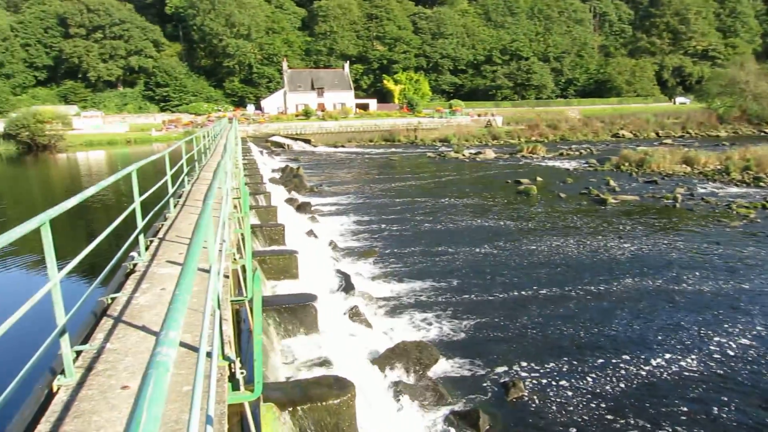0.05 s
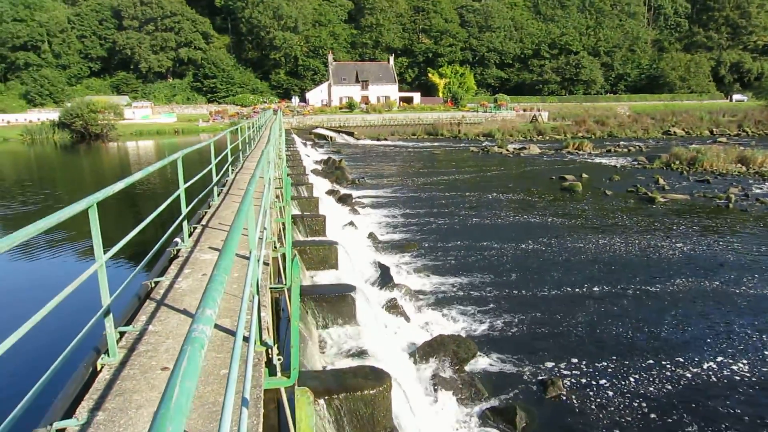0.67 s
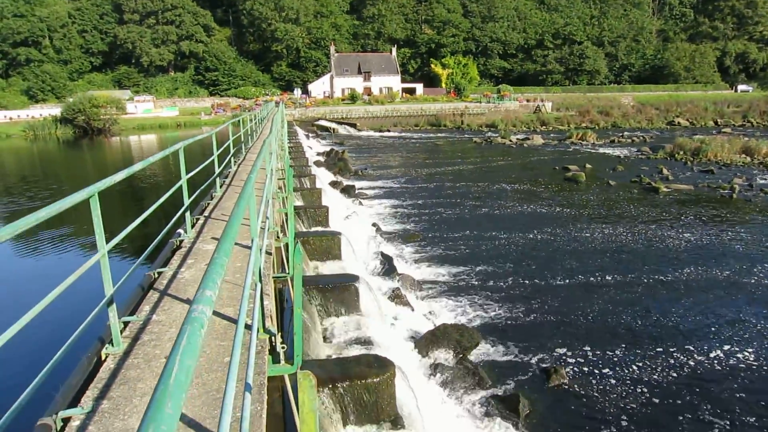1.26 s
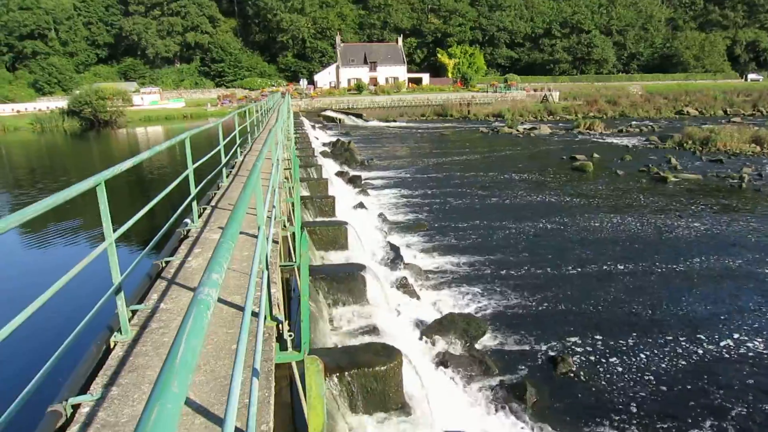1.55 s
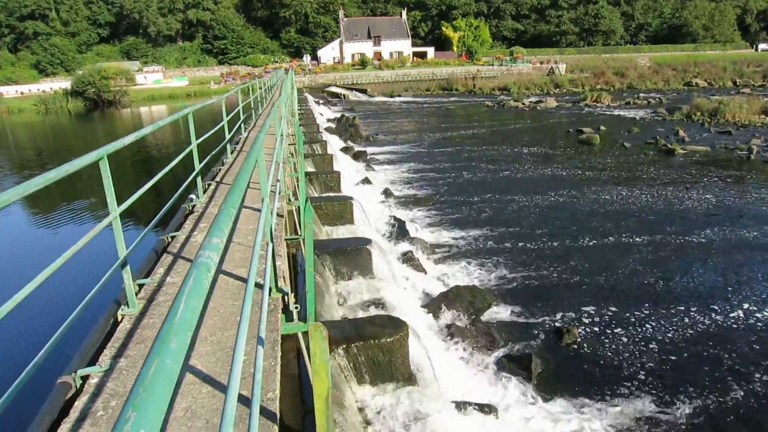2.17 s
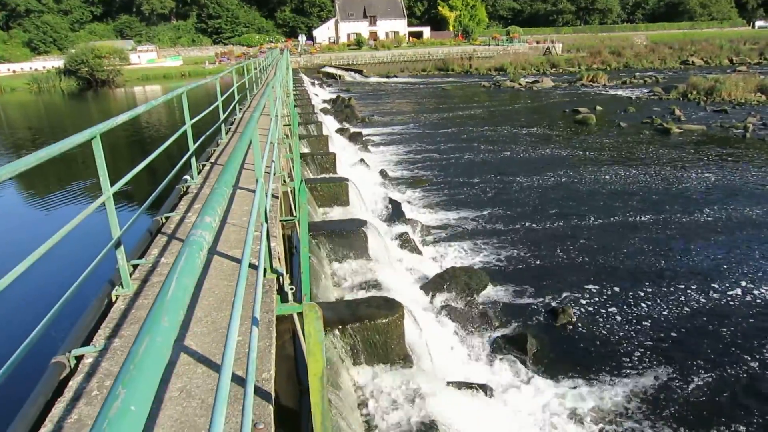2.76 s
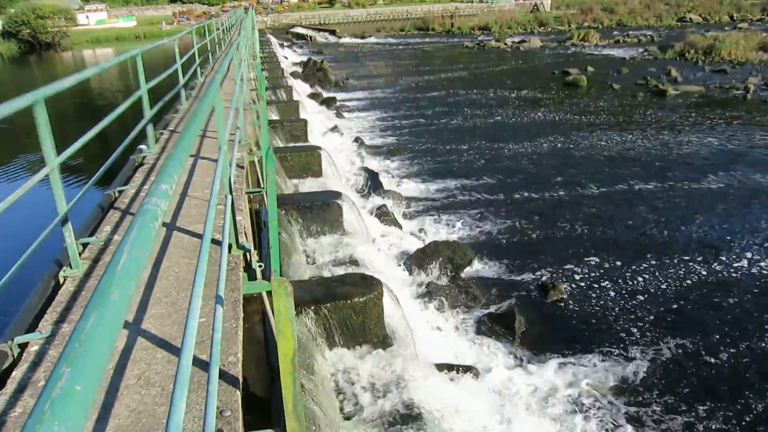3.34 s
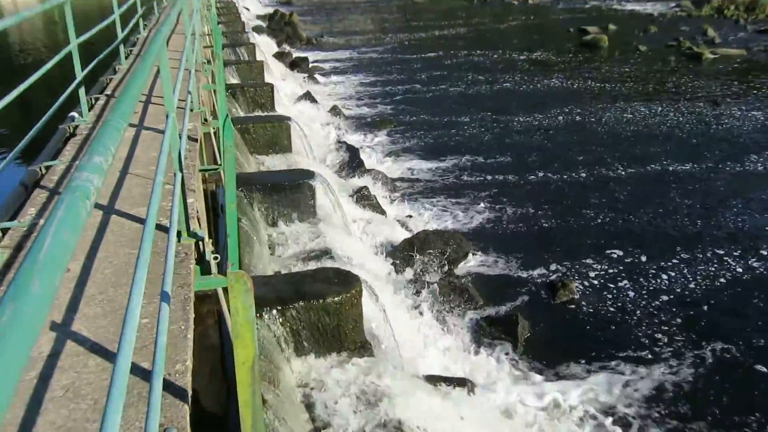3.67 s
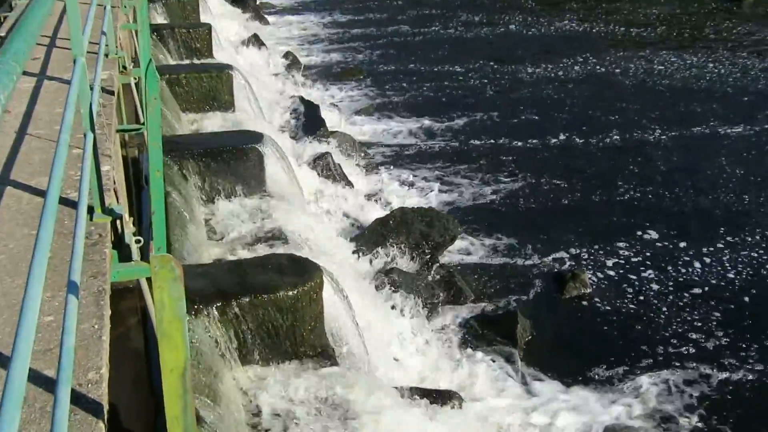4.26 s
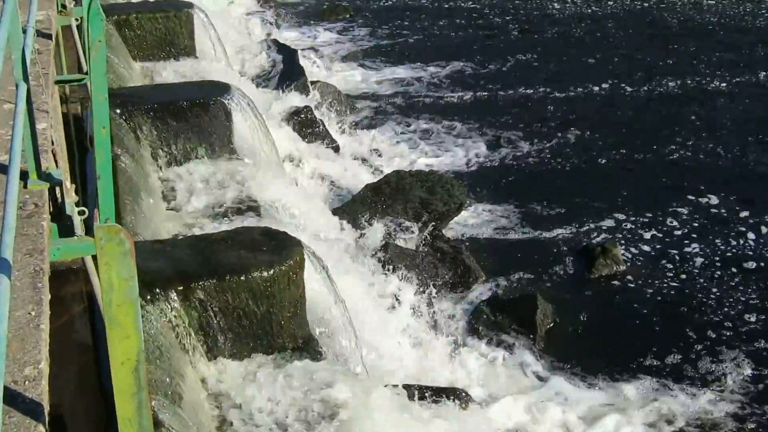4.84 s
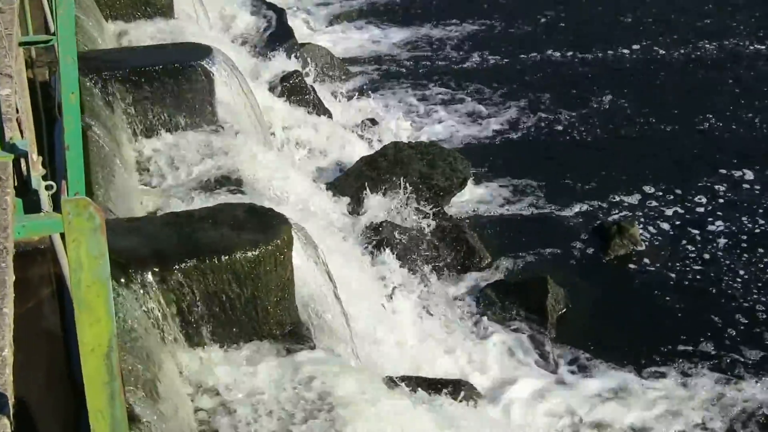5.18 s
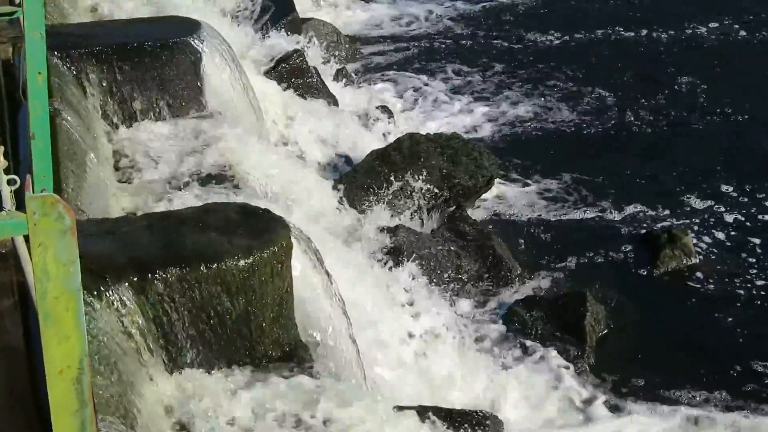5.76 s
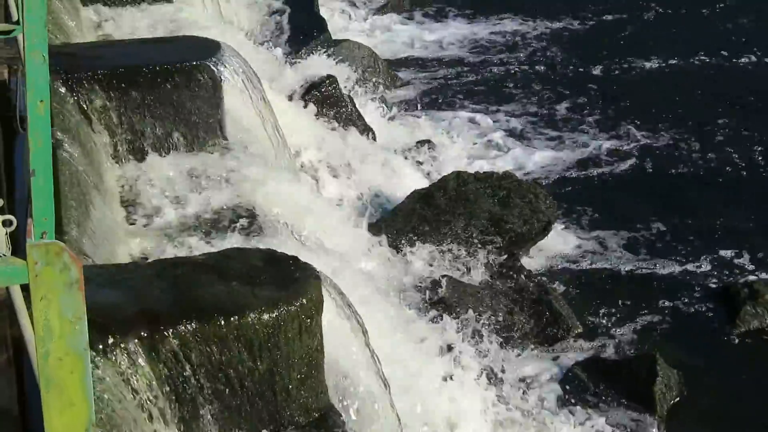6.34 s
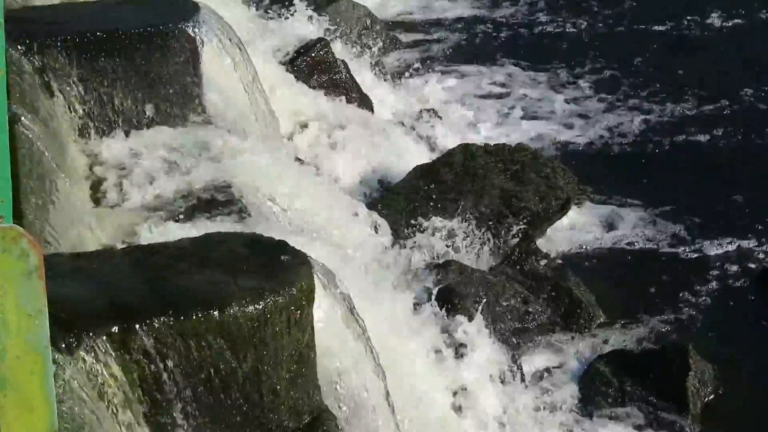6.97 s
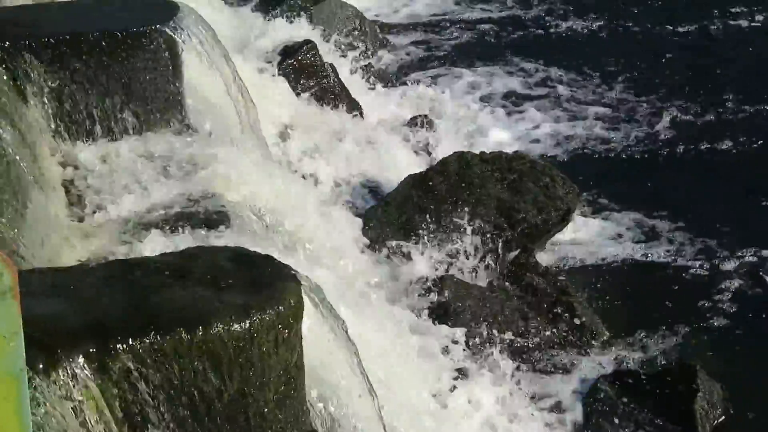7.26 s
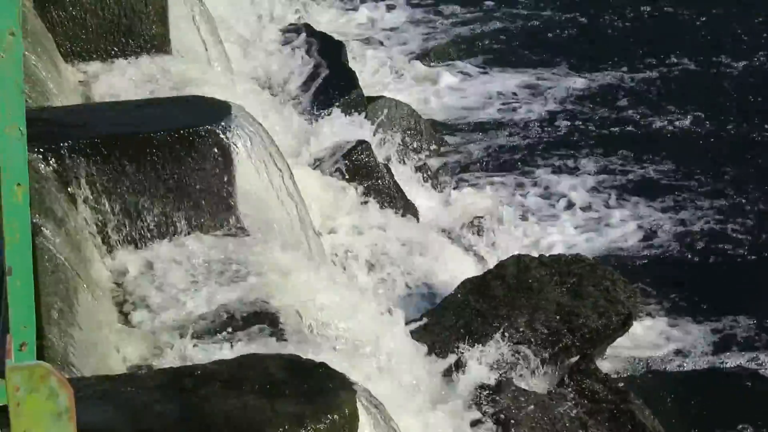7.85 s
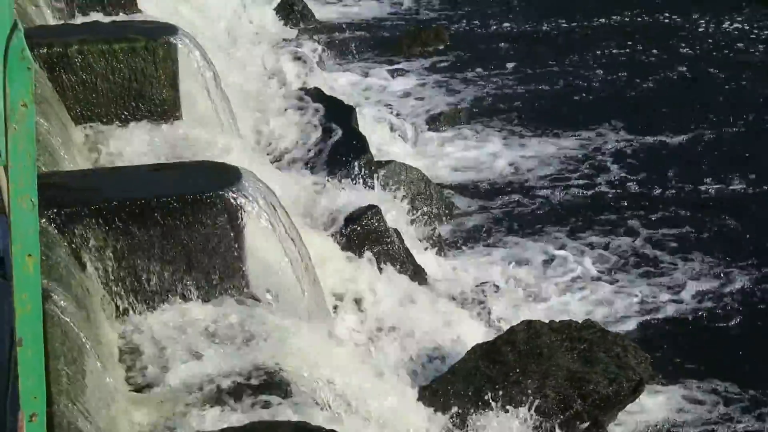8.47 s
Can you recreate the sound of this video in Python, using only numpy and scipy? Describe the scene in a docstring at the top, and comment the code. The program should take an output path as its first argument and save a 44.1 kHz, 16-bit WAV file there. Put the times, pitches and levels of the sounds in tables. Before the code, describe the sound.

Heard from a walkway over a river weir, falling water makes a continuous rushing roar with slight surges, faint gurgling and a hiss of white water on rocks. Brief, soft wind rumbles touch the microphone, strongest at the start. The hiss eases after about three seconds. The water then dips slightly twice and more clearly once near the end, recovering smoothly each time.

```python
"""River over a stepped weir

Heard from the walkway above, water plunges onto rocks and drives air under in a roar that surges about once a
second. White water splashes and fizzes with small bubbles, and puffs of breeze rumble on the microphones. The
splashing steps down once; later the level drops suddenly three times and swells back, deepest near the end."""
import sys
import numpy as np
from scipy import signal
from scipy.fft import rfft, irfft, next_fast_len
from scipy.io import wavfile
from scipy.ndimage import uniform_filter1d, map_coordinates

SR = 44100
rng = np.random.default_rng(int(sys.argv[2]) if len(sys.argv) > 2 else 0)


def unload_wav(signal):
    """Save mono or channel-first audio to the path in sys.argv[1] as 16-bit WAV at rate SR, clipped to [-1, 1]."""
    wavfile.write(
        sys.argv[1],
        SR,
        np.round(np.clip(np.atleast_2d(signal).T, -1, 1) * 32767).astype(np.int16),
    )


N = 384111


def amp(db):
    """Decibels to gain."""
    return 10 ** (np.asarray(db) / 20)


def unit(x):
    """Scale to rms 1."""
    return x / np.sqrt(np.mean(x ** 2) + 1e-20)


def along(points, hz):
    """Read (freq_hz, value) points on a log frequency axis."""
    freqs, values = np.transpose(points)
    return np.interp(np.log(hz + 1), np.log(freqs + 1), values)


def envelope(points):
    """Join (time_s, value) points with straight lines, one value per sample."""
    times, values = np.transpose(points)
    return np.interp(np.arange(N) / SR, times, values)


def wobble(knots_per_s):
    """A smooth random curve."""
    knots = rng.standard_normal(int(N * knots_per_s / SR) + 4)
    return map_coordinates(knots, [np.arange(N) * knots_per_s / SR])


def after(start_s, ramp_s=0.0066):
    """A quick ramp from 0 to 1."""
    return np.clip((np.arange(N) / SR - start_s) / ramp_s, 0, 1)


def swell(peak_s, half_s):
    """A bell curve of height 1."""
    return np.exp(-((np.arange(N) / SR - peak_s) / half_s) ** 2)


def filtered(x, response):
    """Shape x with a gain given as a function of frequency."""
    size = next_fast_len(N + SR // 2)
    hz = np.fft.rfftfreq(size, 1 / SR)
    return irfft(rfft(x, size) * response(hz), size)[..., :N]


def below(hz, edge_hz):
    """Gain of a smooth low-pass."""
    return 1 / np.sqrt(1 + (hz / edge_hz) ** 6)


def panned(db):
    """Left and right gains, the left louder by db."""
    return amp(np.array([db, -db]) / 2)


def spread(pair, colour):
    """Colour a mid and a side signal and mix them into a stereo source of rms 1."""
    # likeness of left and right: freq_hz, coherence
    likeness = [(60, 1), (200, 1), (350, 0.99), (800, 1), (1400, 1), (2000, 0.91), (3300, 1), (4200, .91),
                (6000, 0.93), (9000, 0.85), (10300, 0.79), (12600, 0.65), (14500, 0.81)]

    def mid_side_gains(hz):
        angle = np.arccos(np.clip(along(likeness, hz), 0, 1)) / 2
        return colour(hz) * np.array([np.cos(angle), np.sin(angle)])

    mid, side = filtered(pair, mid_side_gains)
    return unit(np.array([mid + side, mid - side]))


def breeze():
    """Puffs buffet the two microphones, partly together and partly apart, over a faint low rumble."""
    # faint low rumble under the puffs, fading out and returning: time_s, level_db
    faint = [(0, -40), (1.9, -43.5), (2.7, -57), (4.5, -44.5), (8.71, -44)]
    # puffs of breeze: peak_s, level_db
    puffs = [(.12, -30), (.43, -38), (.62, -37), (1.48, -33), (1.8, -38), (2.22, -40), (4.68, -37),
             (5.38, -40), (6.62, -38), (7.12, -41)]
    # colour of the rumble: freq_hz, level_db
    colour = [(20, -32), (40, -16), (65, -2), (110, 1.5), (170, -8.5), (300, -16), (800, -38), (3000, -80)]
    noise = rng.standard_normal((2, N)) + 0.67 * rng.standard_normal(N)
    rumble = filtered(noise, lambda hz: amp(along(colour, hz)))
    flutter = amp(1.5 * wobble(18))
    strength = amp(envelope(faint)) + sum(amp(db) * swell(s, half_s=0.042) for s, db in puffs)
    return strength * unit(flutter * rumble)


def churn(patchy_db, patch_frames):
    """Churning water: two white noises with patches of random gain a few hundred Hz wide."""
    spectra = signal.stft(rng.standard_normal((2, N)), nperseg=256)[2]
    patches = uniform_filter1d(rng.standard_normal(spectra.shape[1:]), size=6, axis=0)
    patches = uniform_filter1d(patches, size=patch_frames, axis=1)
    spectra *= amp(patchy_db * unit(patches))
    return unit(signal.istft(spectra, nperseg=256)[1][:, :N])


def bubbles(count, low_hz, high_hz, cycles, rise, spread_db, ring_samples):
    """A mid and side cloud of bubbles: damped sines that rise in pitch as they near the surface."""
    when, pitch, strength, place = rng.random((count, 4)).T[:, :, None]
    hz = low_hz * (high_hz / low_hz) ** pitch
    turns = hz * np.arange(ring_samples) / SR
    age = turns / cycles
    glide = 1 + rise * np.minimum(age, 2) / 2
    ring = np.sin(2 * np.pi * turns * glide) * np.exp(-2 * age)
    ring *= hz / high_hz  # small bubbles ring briefly but sharply
    ring *= amp(-spread_db * np.log(strength + 0.01))  # most are weak, a few strong
    at = ((when * N).astype(int) + np.arange(ring_samples)).ravel()
    return np.array([unit(np.bincount(at, (ring * gain).ravel(), N)[:N]) for gain in (1, place - 0.5)])


def surging(trough_share=0.3, trough_lead_s=0.3):
    """The flow in dB: it slackens, then a slug of water plunges over."""
    # slugs of water: peak_s, rise_db, half_length_s
    surges = [(1.2, 1.9, 0.18), (2.63, 1.5, 0.12), (3.5, 1.3, 0.27), (4.36, 1.5, 0.17), (5.52, 1.9, 0.097),
              (6.3, 1.8, .16), (6.78, 1, .14), (7.12, 1, .11), (8.55, 1, .18)]
    return sum(db * (swell(s, half_s) - trough_share * swell(s - trough_lead_s, half_s))
               for s, db, half_s in surges)


def dips(recover_db_per_s=2.5, hush_db=2.5):
    """Loss of level in dB: each drop falls at once and swells back steadily."""
    # sudden drops in level: start_s, depth_db
    drops = [(3.76, 1.6), (4.76, 1.5), (7.362, 4)]
    t = np.arange(N) / SR
    loss_db = sum(after(s) * np.maximum(db - recover_db_per_s * (t - s), 0) for s, db in drops)
    hush = after(7.362) - after(7.541)  # the last drop opens with a short, deeper hush
    return loss_db + hush_db * hush


def roar(level_db):
    """The falling sheets drive air under: clouds of large bubbles boom and gurgle."""
    # colour of the plunging water: freq_hz, level_db
    colour = [(22, -36), (35, -27), (48, -16), (65, -5.5), (90, -4.5), (170, -2), (225, 0.3), (300, 0),
              (420, -1.4), (540, -0.5), (720, 0.5), (950, -2.5), (2000, -8.5), (5000, -16)]
    gurgle = bubbles(count=3000, low_hz=219.8, high_hz=1386, cycles=10.3, rise=0.14,
                     spread_db=2, ring_samples=1536)
    water = churn(patchy_db=0.13, patch_frames=20) + amp(-20.5) * gurgle
    body = spread(water, lambda hz: amp(along(colour, hz)) * below(hz, edge_hz=876))
    return amp(level_db + 0.13 * wobble(12)) * body


def splash(surge_db, step_s=2.812, step_down_db=3):
    """White water slaps the rocks in quick uneven bursts, and small bubbles fizz in it."""
    # colour of the white water: freq_hz, level_db
    colour = [(250, -12), (500, -2.5), (800, -0.5), (1400, -1.5), (1950, -3.5), (3100, -2), (4500, -3.5),
              (6200, -5), (7300, -5), (9000, -6), (10200, -8.5), (12000, -9.5), (13600, -17),
              (15200, -27.5)]
    # slow drift of the splashing: time_s, level_db
    drift = [(0, -17.5), (.7, -18), (1.2, -16.5), (1.8, -17), (2.7, -17), (5.6, -18), (5.95, -19),
             (6.4, -17.5), (6.9, -17.2), (7.35, -18.5), (8.71, -16.5)]
    # the hiss dulls a little near the end: time_s, treble_db
    brightness = [(0, 0), (7.35, -0.2), (7.38, -1), (8.71, -1)]
    # where the splashing sits: time_s, left_minus_right_db
    pan = [(0, 0), (.9, 0.7), (2.4, 0.5), (3.1, 0), (7.35, -0.2), (7.38, 1.4)]
    fizz = bubbles(count=16000, low_hz=1002, high_hz=12880, cycles=7, rise=0.12,
                   spread_db=2.5, ring_samples=320)
    water = churn(patchy_db=0.51, patch_frames=14) + amp(-11) * fizz
    low_cut = lambda hz: np.sqrt(1 - below(hz, edge_hz=800) ** 2)
    body = spread(water, lambda hz: amp(along(colour, hz)) * low_cut(hz))
    slap = filtered(body, lambda hz: below(hz, edge_hz=3200))
    hiss = (body - slap) * amp(envelope(brightness))
    level_db = envelope(drift) - step_down_db * after(step_s) + surge_db
    bursts_db = 0.27 * wobble(24) + 0.27 * wobble(70)
    return amp(level_db + bursts_db) * (slap + hiss) * panned(envelope(pan))


def scene():
    """One surging flow drives the roar and, faintly, the splashing; the breeze blows on its own."""
    surge_db = surging()
    water = roar(level_db=-28 + surge_db) + splash(0.12 * surge_db)
    return water * amp(-dips()) + breeze()


def record(dry, top_hz=15250):
    """Each microphone adds its own colour and phase; nothing passes above the band limit."""
    # unequal colour of the microphones: freq_hz, left_minus_right_db
    balance = [(100, -0.3), (1500, -1.5), (2100, -4.5), (3200, -0.9), (4600, -2), (6900, -2.5),
               (7900, -1.5), (9100, -2.5), (10300, 1), (11700, -1), (13500, 1.2)]
    # phase lead of the left microphone: freq_hz, lead_rad
    lead = [(600, 0.011), (1700, -0.015), (2500, 0.22), (3500, 0.064), (8300, 0.094), (9800, 0.43),
            (11200, .23), (12200, .55), (14300, 0)]
    phase = lambda hz: np.exp(0.5j * np.outer([1, -1], along(lead, hz)))
    return filtered(dry, lambda hz: panned(along(balance, hz)) * phase(hz) * (hz < top_hz))


dry = scene()
out = record(dry)
unload_wav(out)
```